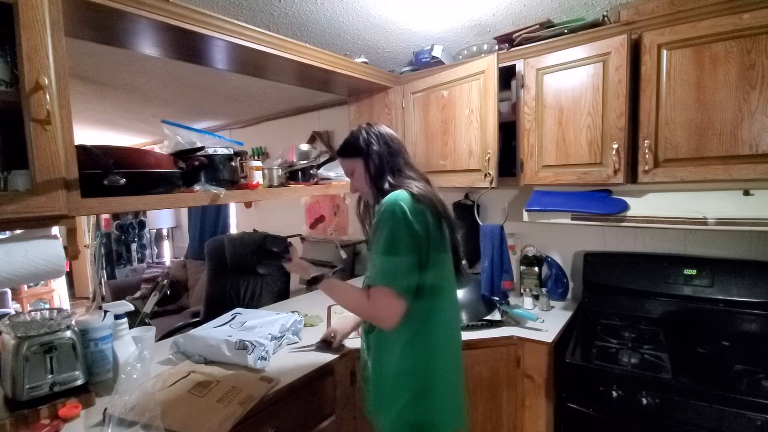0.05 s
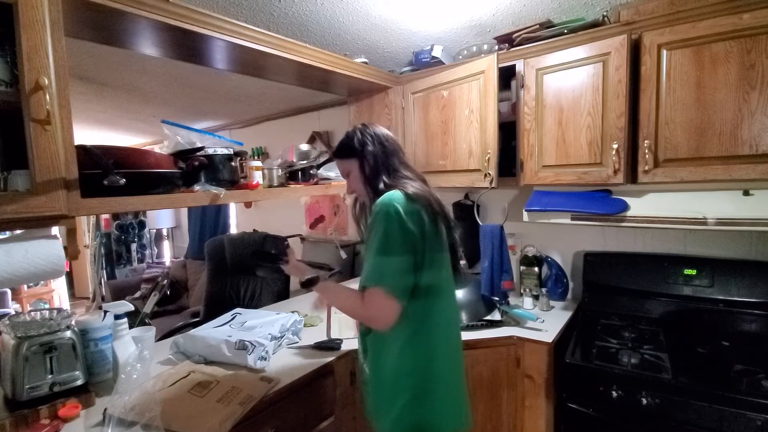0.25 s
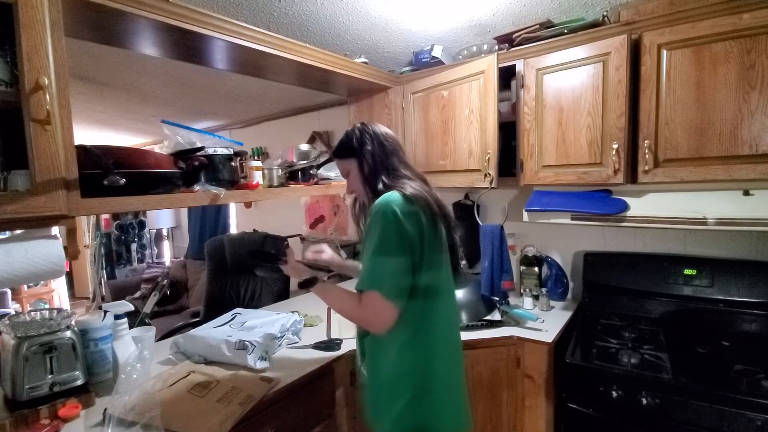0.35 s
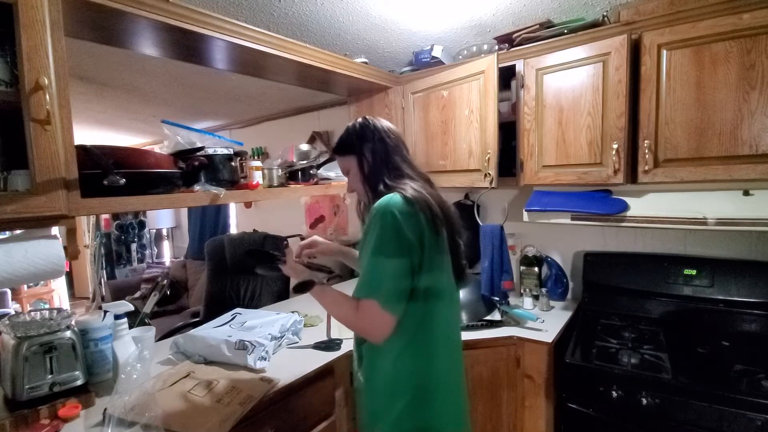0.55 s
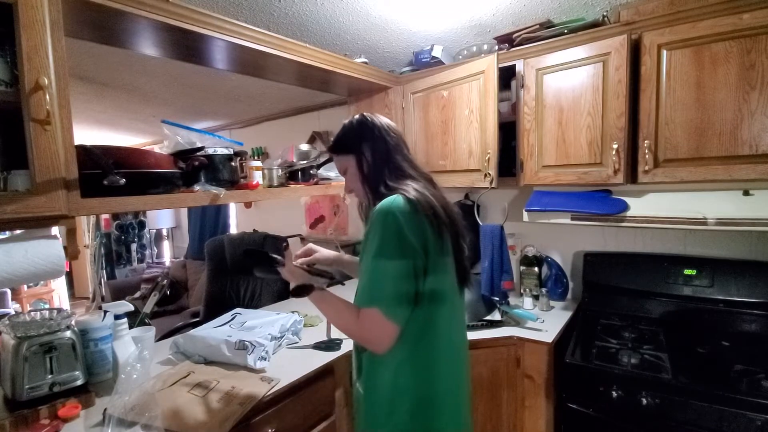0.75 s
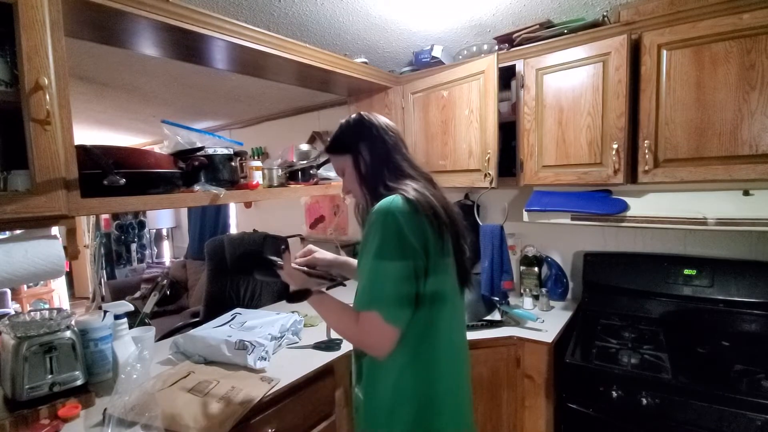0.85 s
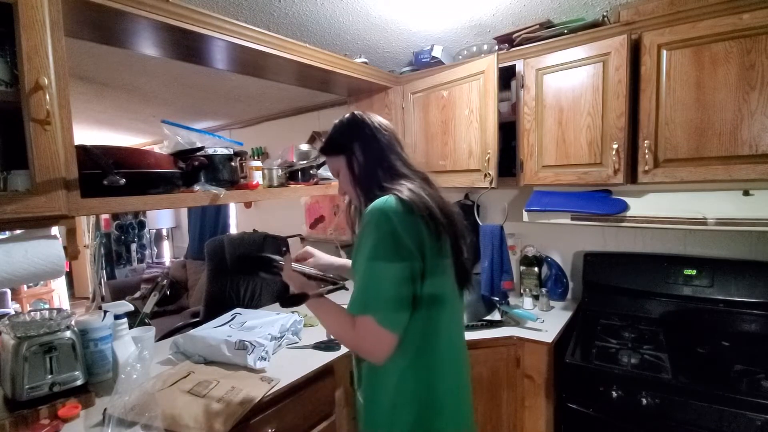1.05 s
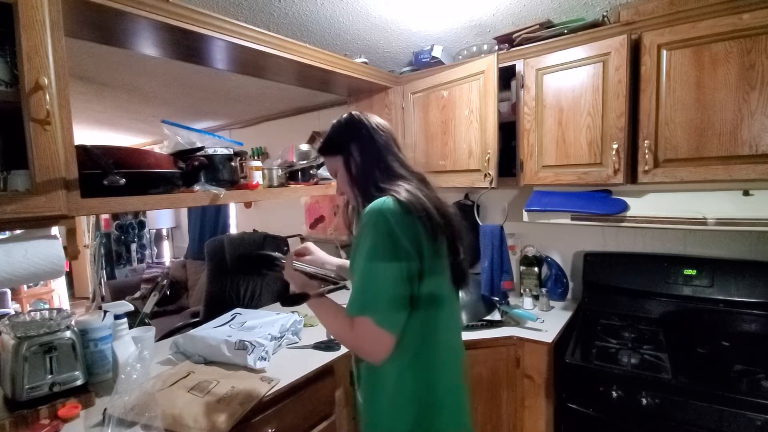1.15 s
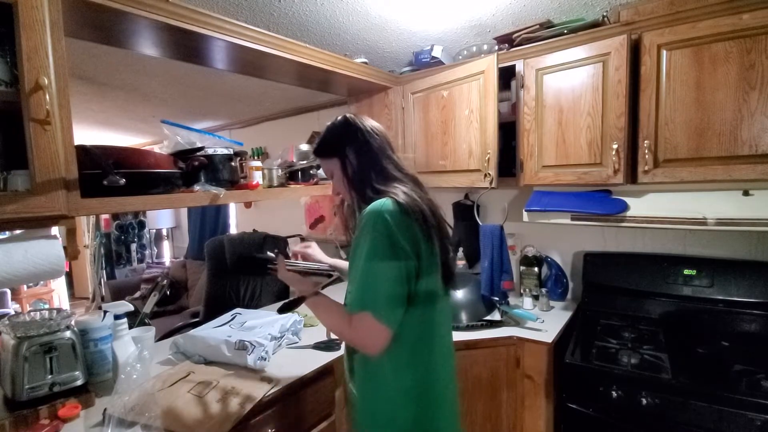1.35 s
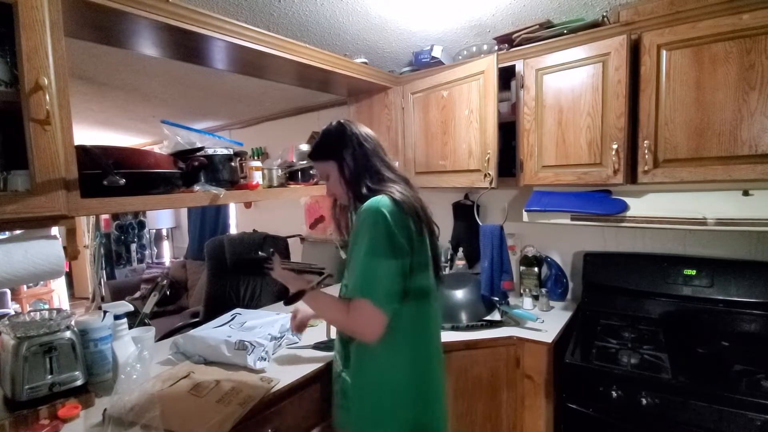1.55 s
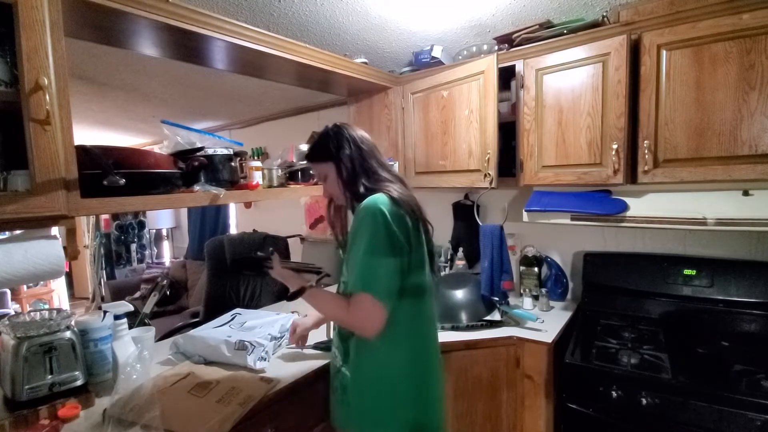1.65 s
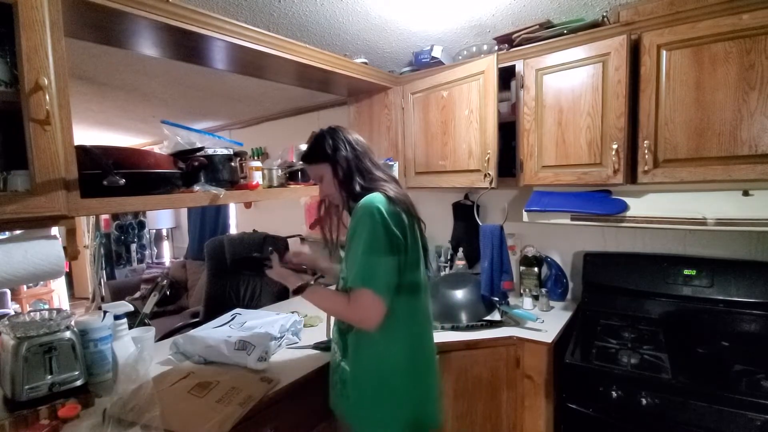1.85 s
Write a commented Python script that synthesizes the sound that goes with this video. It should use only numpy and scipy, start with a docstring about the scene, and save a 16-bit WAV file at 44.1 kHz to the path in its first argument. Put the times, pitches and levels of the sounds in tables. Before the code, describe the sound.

Metal tongs clatter on a kitchen counter: after a barely audible bump at the start, sharp overlapping clacks burst out at 0.2-0.3 seconds, with dense rattling fading by 0.5. Short reflections answer in a small hard room. Near-quiet follows, then crisp light ticks around 1.2, a very faint scrape at 1.3-1.4, and tiny touches near 1.8. Low appliance hum and soft room noise continue throughout, in stereo.

```python
"""Metal tongs clack and clatter on a kitchen counter, then tick lightly and scrape as they are handled.
Clacks and clatter ring damped steel and counter modes; ticks are noise bursts; slips drive the scrape.
A small hard room answers with sparse reflections; an appliance hums in sines under shaped room noise.
Two spaced microphones hear it, the left one later."""
import sys
import numpy as np
from scipy import signal
from scipy.io import wavfile

SR = 44100
rng = np.random.default_rng(int(sys.argv[2]) if len(sys.argv) > 2 else 0)


def how_loud(loudness_db):
    """Turn decibels into a plain amplitude multiplier (0 dB gives 1, 20 dB gives 10)."""
    steps = np.asarray(loudness_db, float) / 20
    return 10 ** steps


def file_out(sig):
    """Save sig as 16-bit WAV at sys.argv[1]."""
    # one column per channel
    cols = np.atleast_2d(sig).T
    # limit, then scale
    lim = np.clip(cols, -1, 1)
    pcm = np.round(lim * 32767).astype(np.int16)
    wavfile.write(sys.argv[1], SR, pcm)


N = 83790
LEFT_LAG_SAMPLES = 21


def evened(x):
    """Scales to rms 1."""
    return x / np.sqrt(np.mean(x ** 2) + 1e-20)


def read(points, hz):
    """Reads a table on a log-frequency axis."""
    f, value = np.transpose(points)
    return np.interp(np.log(hz + 1), np.log(f + 1), value)


def add(mix, s, sound):
    """Mixes a sound in at time s."""
    part = mix[round(s * SR):][:len(sound)]
    part += sound[:len(part)]


def colour(points):
    """Causal (minimum-phase) click with the given spectrum, energy 1."""
    hz = abs(np.fft.fftfreq(2048, 1 / SR))
    log_gain = np.log(how_loud(read(points, hz)))
    click = np.fft.ifft(np.exp(np.conj(signal.hilbert(log_gain)))).real[:1024]
    return click / np.linalg.norm(click)


def ring(modes, detune, lift_db=0):
    """One strike of damped modes, each excited and tuned a little differently; onset rms 1."""
    spread_db, rise_s = 3, .0012
    hz, db, t60_s = np.transpose(modes)[:, :, None]
    t = np.arange(SR // 3) / SR
    level_luck, pitch_luck, phase = rng.standard_normal((3, len(modes), 1))
    waves = np.sin(2 * np.pi * (hz * (1 + detune * pitch_luck) * t + phase))
    decay = how_loud(db + lift_db + spread_db * level_luck - 60 * t / t60_s)
    out = (decay * waves).sum(0) * (1 - np.exp(-t / rise_s))
    return out / np.sqrt(np.mean(out[:400] ** 2))


def crack(points, decay_s, snap_db=0):
    """First-contact snap and a decaying noise burst, both coloured."""
    t = np.arange(SR // 8) / SR
    burst = rng.standard_normal(len(t)) * np.exp(-t / decay_s)
    burst[0] = how_loud(snap_db)
    return signal.fftconvolve(burst, colour(points))[:len(t)]


# Steel modes: f/Hz, level/dB, t60/s
STEEL_MODES = [(1196, 10.5, 0.023), (1571, 3, .04), (1709, -2.5, 0.033), (1942, -9, 0.027),
               (2444, -4, 0.032), (2580, -5.5, .025), (3126, -1, .035), (3332, -6, 0.041),
               (4050.4, -3.5, 0.022), (4603, -15.5, .03), (4963, -3, 0.019), (5662.5, -9, 0.037),
               (6870, -11.5, .02), (7400, -13, .015)]
# Counter modes: f/Hz, level/dB, t60/s
COUNTER_MODES = [(79, -8, 0.17), (125, -11.5, 0.087), (221, -12, 0.093), (339.43, 1.5, 0.041),
                 (453, -1.5, 0.033), (528.7, -2.5, 0.076), (733.7, -5.5, .04), (939.3, 7, .025)]
# Crack spectrum: f/Hz, level/dB
CRACK_SPECTRUM = [(120, -29), (300, -10), (900, -7.5), (1700, -11.5), (3000, -14.5), (5500, -10.5),
                  (8000, -22), (10000, -25), (15000, -26), (18000, -32)]
# Clacks: t/s, steel level/dB, favoured steel f/Hz, counter level/dB, favoured counter f/Hz, crack level/dB
CLACKS = [(.198, -26, 1600, -26, 450, -24), (0.2215, -19, 5300, -27.5, 500, -16),
          (.2243, -19, 1743, -29.5, 700, -24), (.229, -28.5, 1200, -13.5, 900, -21),
          (.238, -23, 2500, -32, 90, -18), (0.2984, -18.5, 3240, -25, 500, -20.5),
          (.304, -21, 1200, -17.5, 380, -26), (0.317, -22.5, 2500, -23.5, 400, -27),
          (0.367, -33.5, 3000, -26.5, 450, -34), (0.404, -27.5, 2340, -34.5, 330, -42)]


def blows():
    """Each clack rings steel and counter modes, strongest near favoured pitches, and cracks."""
    steel_db_per_oct, counter_db_per_oct, detune = -12, -9.5, .015
    thud_rise_s, crack_decay_s, snap_db = .0033, .0064, 10.5
    out, t = np.zeros(N), np.arange(SR // 3) / SR
    steel_hz, counter_hz = np.array(STEEL_MODES)[:, :1], np.array(COUNTER_MODES)[:, :1]
    for s, steel_db, high_hz, counter_db, low_hz, crack_db in CLACKS:
        steel = ring(STEEL_MODES, detune, steel_db_per_oct * abs(np.log2(steel_hz / high_hz)))
        counter = ring(COUNTER_MODES, detune, counter_db_per_oct * abs(np.log2(counter_hz / low_hz)))
        thud = counter * (1 - np.exp(-t / thud_rise_s))
        add(out, s, how_loud(steel_db) * steel + how_loud(counter_db) * thud)
        add(out, s, how_loud(crack_db) * crack(CRACK_SPECTRUM, crack_decay_s, snap_db))
    return out


# Knock spectrum: f/Hz, level/dB
KNOCK_SPECTRUM = [(120, -41), (200, -12.5), (458, -1), (715, -7), (1230, -4), (1400, -10), (2600, -2.5),
                  (9000, -45), (11700, -68.5), (19800, -120)]
# Clatter: t/s, level before trim/dB, counter re level/dB, treble re level/dB
CLATTER = [(.199, -27.5, -7.5, -13.5), (.219, -30, -5, -13), (.232, -22.5, -6.5, -8.5),
           (.27, -25, -7.5, -5.5), (.293, -22.5, -8.5, -15.5), (.31, -19, -6, -20.5),
           (.345, -28.5, -9.5, -17.5), (.38, -24.5, -6.5, -24), (.42, -28, 0, -28.5),
           (.445, -29.5, -3.5, -46), (0.479, -39, -6.5, -38), (0.531, -51.5, -2, -40.5)]


def rattle():
    """The loose arms chatter: many small random knocks, each a click with a little ring."""
    knocks_per_s, size_spread_db, trim_db, steel_re_db, detune = 1200, 3, -4.5, -16, .08
    s, db, counter_re_db, treble_re_db = np.transpose(CLATTER)
    t, out = np.arange(N) / SR, np.zeros(N)
    on = (t > s[0]) & (t < s[-1])
    size = how_loud(size_spread_db * np.minimum(rng.exponential(1, N), 4))
    hit = rng.random(N) < knocks_per_s / SR
    knocks = evened(size * hit * rng.choice([-1, 1], N)) * on
    kind = rng.integers(0, 8, N)  # which of 8 variants each knock plays
    steel = [ring(STEEL_MODES, detune) for _ in range(8)]
    counter = [ring(COUNTER_MODES, detune) for _ in range(8)]
    click = [colour(KNOCK_SPECTRUM)] * 8
    highpass = signal.butter(2, 6000, "high", fs=SR)
    treble = [signal.lfilter(*highpass, colour(CRACK_SPECTRUM))] * 8
    layers = (steel_re_db, steel), (0, click), (counter_re_db, counter), (treble_re_db, treble)
    for re_db, variants in layers:
        drive = knocks * how_loud(np.interp(t, s, db + re_db) + trim_db)
        for k, sound in enumerate(variants):
            out += signal.fftconvolve(drive * (kind == k), sound / np.linalg.norm(sound))[:N]
    return out


# Tick spectrum: f/Hz, level/dB
TICK_SPECTRUM = [(300, -15), (800, 7), (1480, -4.5), (2000, -10), (2400, 0), (3100, -0.5), (3970, -13.5),
                 (5500, -0.5), (6500, -10.5), (7600, -3), (8870, -20), (12000, -6.5), (15000, -3),
                 (18000, -4)]
# Light ticks: t/s, level/dB, low edge f/Hz, high edge f/Hz, decay/s, snap level/dB
TOUCHES = [(.845, -73.5, 3498, 8000, .01, 6), (1.017, -70, 1800, 5946, 0.0054, 5),
           (1.163, -45, 2200, 17900, .002, 11.5), (1.193, -42.5, 2185, 17730, 0.00456, 15),
           (1.205, -45.5, 4500, 18000, .004, -2), (1.221, -56.5, 2353, 8154, 0.0032, 5),
           (1.283, -60.5, 400, 2460, .006, 3), (1.774, -74.5, 1500, 9053, 0.042, -2.5),
           (1.817, -56.5, 1493, 3850, .012, -0.5), (1.824, -57.5, 650, 2980, 0.018, -0.5),
           (1.838, -62.5, 4829, 17880, 0.0053, 3.5)]


def ticks():
    """Light touches of steel on steel: band-limited snaps and bursts, set by onset rms."""
    out = np.zeros(N)
    for s, db, low_hz, high_hz, decay_s, snap_db in TOUCHES:
        band = signal.butter(3, [low_hz, high_hz], "band", fs=SR, output="sos")
        tick = signal.sosfilt(band, crack(TICK_SPECTRUM, decay_s, snap_db))
        add(out, s, how_loud(db) * tick / np.sqrt(np.mean(tick[:200] ** 2)))
    return out


def bump():
    """One soft low bump at the very start: a damped sine."""
    level_db, hz, t60_s = -57, 143, .01
    out, t = np.zeros(N), np.arange(SR // 3) / SR
    add(out, 0, how_loud(level_db - 60 * t / t60_s) * np.sin(2 * np.pi * hz * t))
    return out


# Scrape hiss spectrum: f/Hz, level/dB
HISS_SPECTRUM = [(590, -38.5), (1000, -9.5), (1440, -12.5), (1490, -12.5), (3350, -4.5), (15000, -24.5),
                 (16500, -29)]
# Scrape path: t/s, level/dB, resonance f/Hz
SCRAPE_PATH = [(1.27, -74.5, 2790), (1.326, -65.5, 2793), (1.348, -70.5, 3010), (1.39, -66, 3100),
               (1.44, -113.5, 3094)]


def scrape():
    """Tiny slips excite a gliding resonance and a hiss."""
    pole_width_hz, hiss_re_tone_db, slips_per_s = 500, 1.5, 3800
    s, db, hz = np.transpose(SCRAPE_PATH)
    t = np.arange(N) / SR
    slips = rng.standard_normal(N) * (.15 + (rng.random(N) < slips_per_s / SR))
    # Resonate at 0 Hz in a frame that turns with the glide
    turn = np.exp(2j * np.pi * np.cumsum(np.interp(t, s, hz)) / SR)
    r = np.exp(-np.pi * pole_width_hz / SR)
    once = signal.lfilter([1 - r], [1, -r], slips / turn)
    twice = signal.lfilter([1 - r], [1, -r], once)
    tone = (turn * twice).real
    hiss = signal.fftconvolve(slips, colour(HISS_SPECTRUM))[:N]
    level = how_loud(np.interp(t, s, db, -120, -120))
    return level * (evened(tone) + how_loud(hiss_re_tone_db) * evened(hiss))


def paired(z, same):
    """Makes the second of two spectra partly like the first."""
    same = np.clip(same, -1, 1)[:, None]
    return np.array([z[0], same * z[0] + np.sqrt(1 - same ** 2) * z[1]])


# Room decay: f/Hz, t60/s
ROOM_DECAY = [(80, .3), (300, 0.17), (1000, 0.35), (2500, 0.27), (5000, 0.24), (10000, 0.14), (16000, .17)]
# Room left-right likeness: f/Hz, likeness/1
ROOM_LIKENESS = [(100, .99), (250, .7), (500, .25), (1000, .2), (2000, 0), (4000, 0)]


def reflections():
    """Sparse reflections of random sign, bands dying at their own speeds; near surfaces add early ones."""
    early_db, early_t60_s = 6.5, .034  # near cabinets and counter
    taps = np.zeros((2, SR))
    slots = np.arange(100, SR - 20, 20)
    at = slots + rng.integers(0, 20, (2, len(slots)))
    np.put_along_axis(taps, at, rng.choice([-1., 1.], at.shape), 1)
    hz, t, z = signal.stft(taps, SR, nperseg=256)
    late = how_loud(-60 * t / read(ROOM_DECAY, hz)[:, None])
    early = how_loud(early_db - 60 * t / early_t60_s)
    z = paired(z, read(ROOM_LIKENESS, hz)) * (late + early)
    z = z / np.linalg.norm(z, axis=2, keepdims=True)  # equal energy in every band
    tail = signal.istft(z, SR, nperseg=256)[1]
    return np.array([np.roll(tail[0], LEFT_LAG_SAMPLES), tail[1]]) / np.linalg.norm(tail[0])


def room(near):
    """Three random sets of reflections take turns, so no one echo pattern stands out; few lows return."""
    level_db, low_edge_hz, turn_s = 1, 160, .09
    sent = signal.lfilter(*signal.butter(2, low_edge_hz, "high", fs=SR), near)
    turn = np.pi * np.arange(N) / SR / turn_s
    out = np.zeros((2, N))
    for k in range(3):
        share = np.sqrt(2 / 3) * abs(np.cos(turn + k * np.pi / 3))
        out += signal.fftconvolve((sent * share)[None], reflections(), axes=1)[:, :N]
    return how_loud(level_db) * out


def slow(hz):
    """Random wander of rms 1: twelve sines up to hz."""
    t = np.arange(N) / SR
    rates_hz = hz * np.geomspace(.1, 1, num=12)
    return evened(sum(np.sin(2 * np.pi * (f * t + rng.random())) / np.sqrt(f) for f in rates_hz))


# Appliance hum: f/Hz, level/dB
HUM_TONES = [(118, -62), (236, -62), (320, -70), (402, -64.5)]


def hum():
    """Appliance tones whose level and pitch waver."""
    waver_db, waver_hz = 2.5, 2.8  # rms
    out = np.zeros(N)
    for hz, db in HUM_TONES:
        cycles = rng.random() + np.cumsum(hz + waver_hz * slow(11)) / SR
        out += how_loud(db + waver_db * slow(12)) * np.sqrt(2) * np.sin(2 * np.pi * cycles)
    return out


# Room noise spectrum: f/Hz, relative level/dB
AIR_SPECTRUM = [(20, -5), (70, -3.5), (121, -11.5), (170, -14), (244, -8.5), (404, -13), (535, -16.5),
                (1110, -28), (1800, -34.5), (2600, -41.5), (6000, -46), (7500, -49), (9500, -64),
                (12000, -49.5), (16500, -48.5)]
# Room noise left-right likeness: f/Hz, likeness/1
AIR_LIKENESS = [(30, 0.957), (150, 0.93), (400, .7), (1000, .55), (3000, 0.12), (12000, 0.14)]


def air():
    """Steady room noise: shaped noise, partly alike left and right, the left later."""
    level_db = -53.5
    hz, _, z = signal.stft(rng.standard_normal((2, N + SR)), SR, nperseg=2048)
    z = paired(z, read(AIR_LIKENESS, hz)) * how_loud(read(AIR_SPECTRUM, hz))[:, None]
    left, right = signal.istft(z, SR, nperseg=2048)[1][:, SR // 2:]
    noise = np.array([left[:N], right[LEFT_LAG_SAMPLES:N + LEFT_LAG_SAMPLES]])
    return how_loud(level_db) * evened(noise)


def scene():
    """Direct sound reaches the left microphone later and a little louder; room and background join."""
    left_db = .67  # the right gets the opposite
    near = blows() + rattle() + ticks() + bump() + scrape()
    direct = np.array([np.roll(near, LEFT_LAG_SAMPLES // 2), np.roll(near, -LEFT_LAG_SAMPLES // 2)])
    balance = how_loud(np.array([[left_db], [-left_db]]))
    return (direct + room(near)) * balance + air() + hum()


def top_cut(x):
    """Nothing passes above the cut-off."""
    return signal.sosfilt(signal.butter(12, 16860, fs=SR, output="sos"), x)


def record(dry):
    """Shelves off the top of the treble."""
    edge_hz, shelf_db = 15750, -21.5
    lowpass = signal.firwin(511, edge_hz, window=("kaiser", 7), fs=SR)
    low = signal.oaconvolve(dry, lowpass[None], "same")
    mix = low + how_loud(shelf_db) * (dry - low)
    return top_cut(mix)


dry = scene()
out = record(dry)
file_out(out)
```